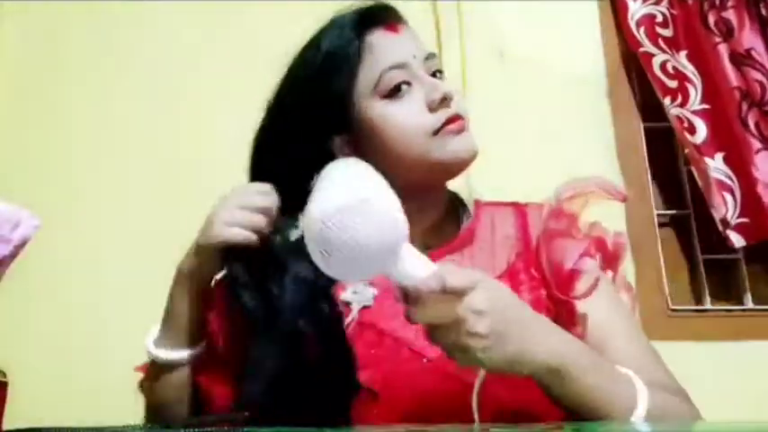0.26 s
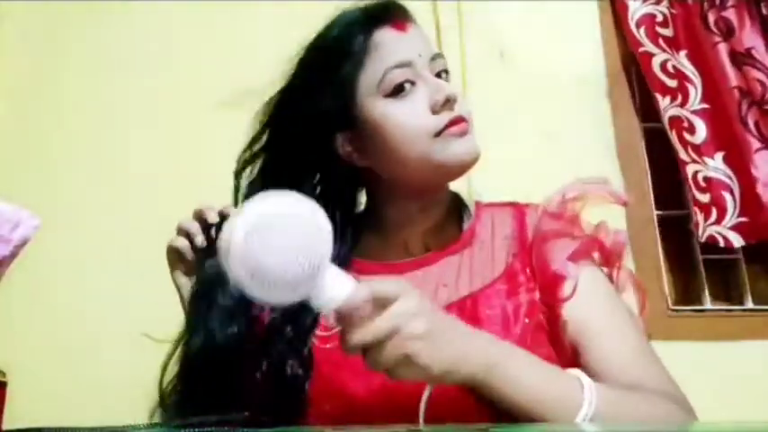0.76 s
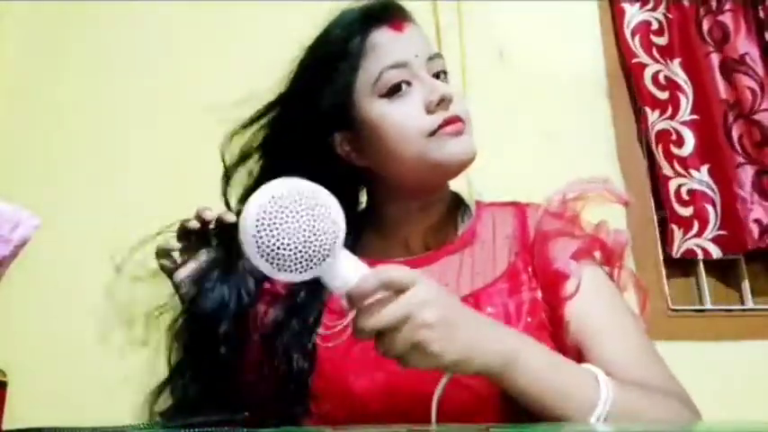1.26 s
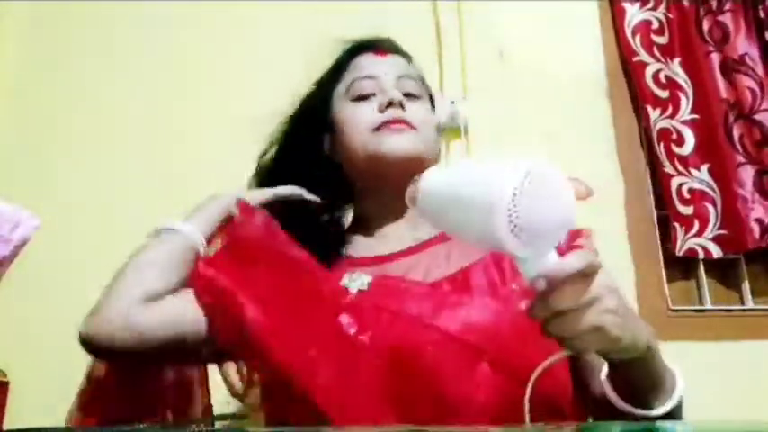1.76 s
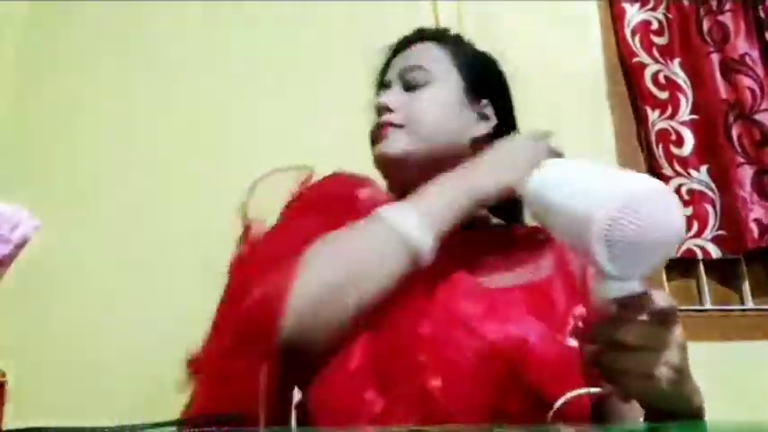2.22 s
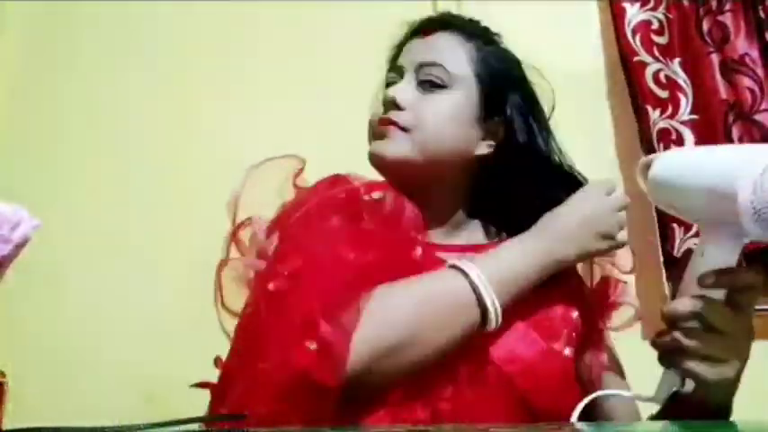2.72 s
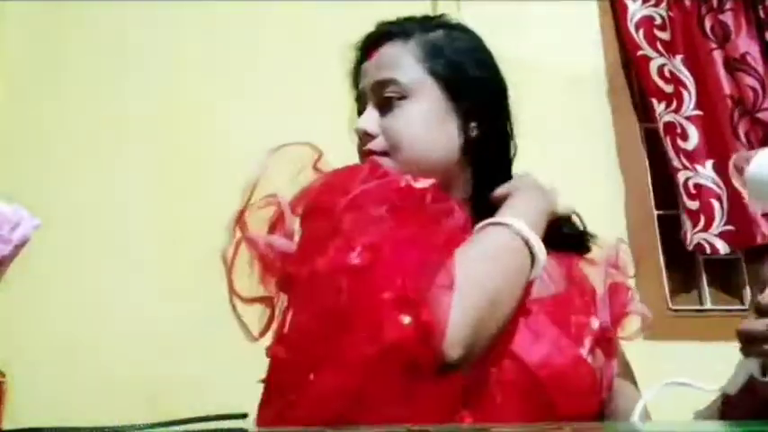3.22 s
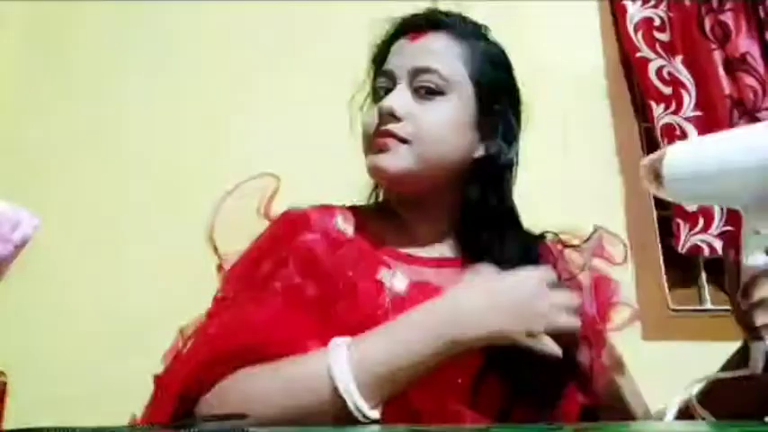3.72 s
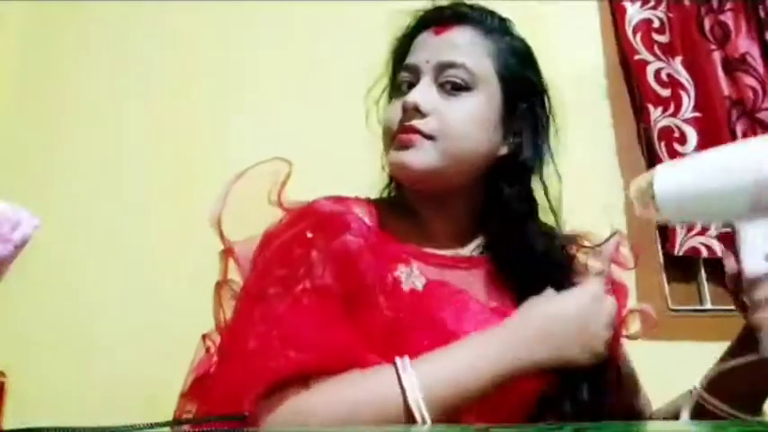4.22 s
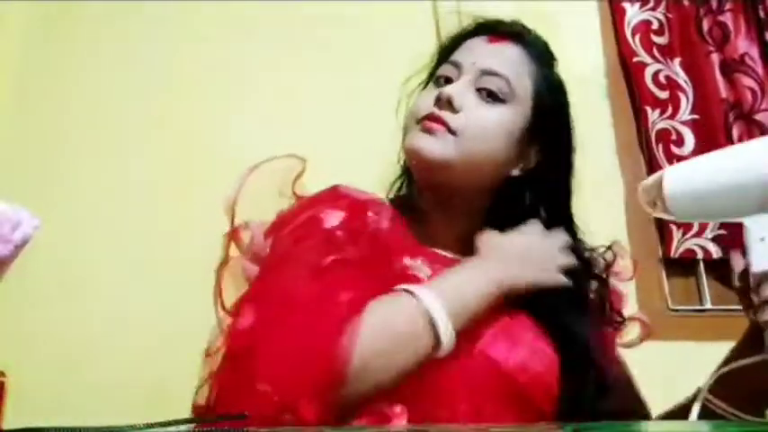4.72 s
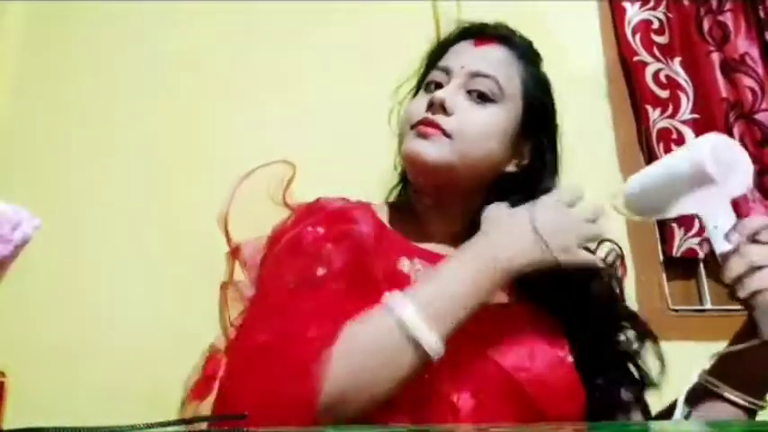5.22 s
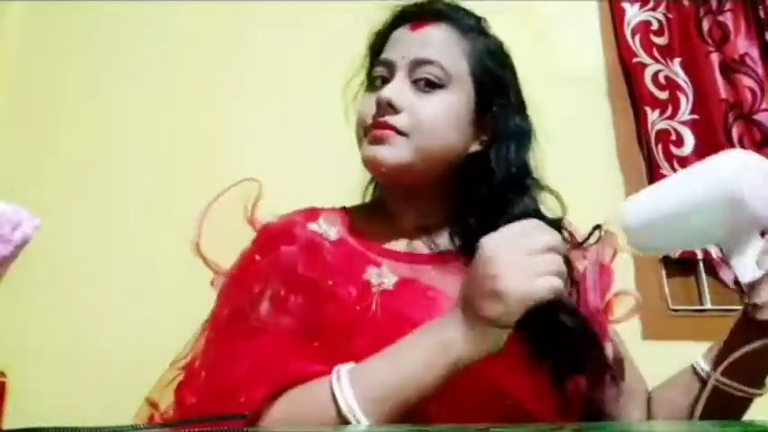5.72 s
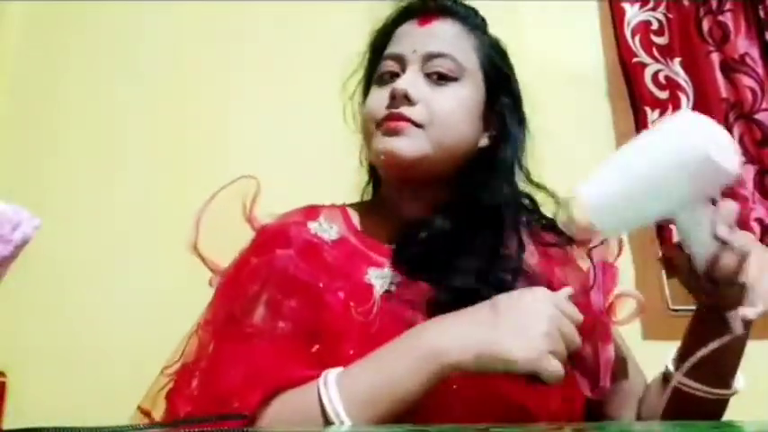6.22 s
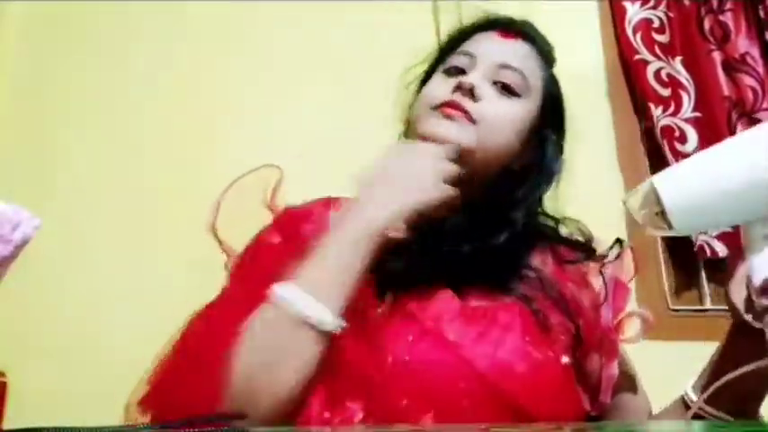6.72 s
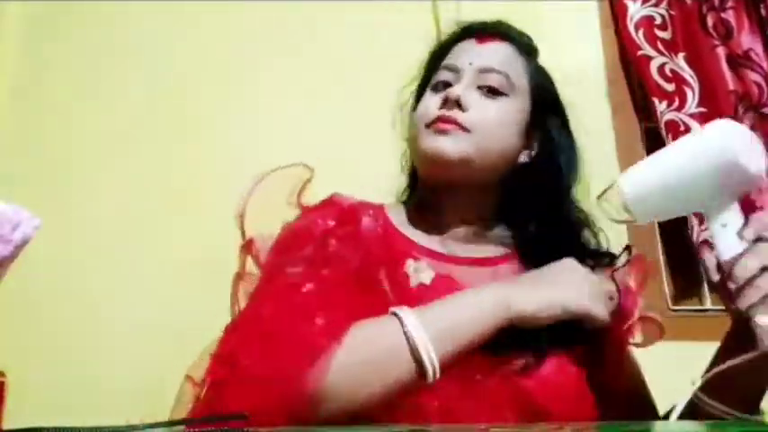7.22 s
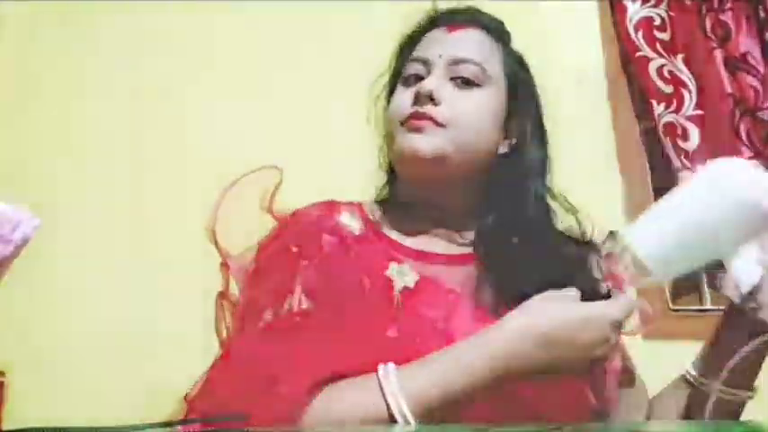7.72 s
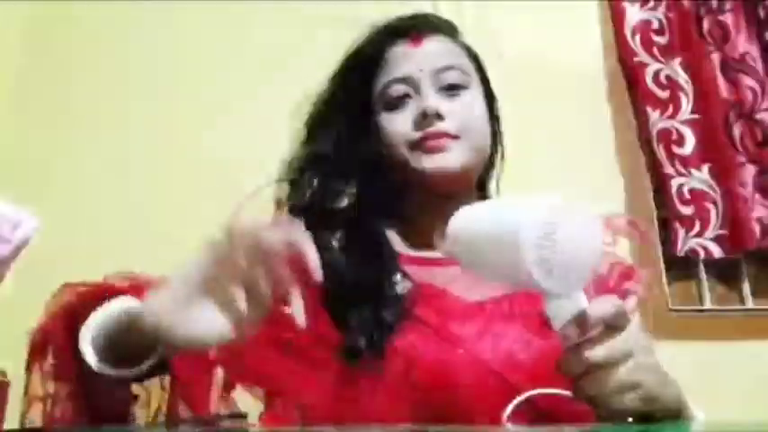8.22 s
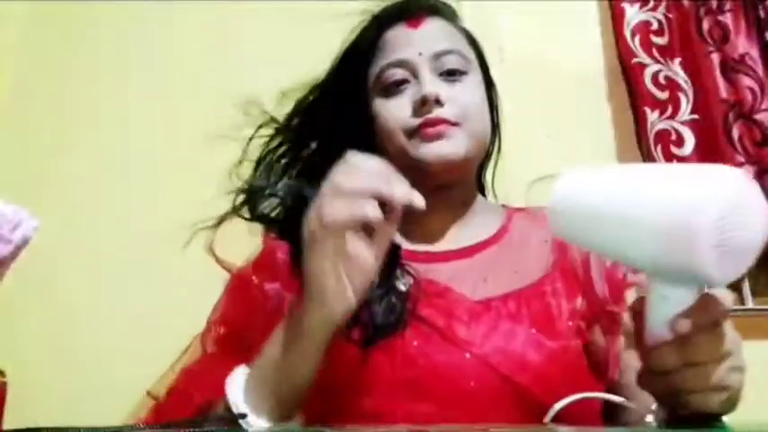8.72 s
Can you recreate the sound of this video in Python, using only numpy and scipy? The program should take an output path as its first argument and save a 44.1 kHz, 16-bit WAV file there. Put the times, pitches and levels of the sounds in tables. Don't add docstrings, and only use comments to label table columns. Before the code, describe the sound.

A handheld hair dryer blows steadily up close in a small room, rushing and howling, fading to silence near eight seconds and returning.

```python
import sys
import numpy as np
from scipy import signal
from scipy.io import wavfile
from scipy.ndimage import uniform_filter1d

SR = 44100
rng = np.random.default_rng(int(sys.argv[2]) if len(sys.argv) > 2 else 0)


def makeup_ratio(level_db):
    decades = np.asarray(level_db, float) / 20
    return 10 ** decades


def file_out(sig):
    cols = np.atleast_2d(sig).T
    lim = np.clip(cols, -1, 1)
    pcm = np.round(lim * 32767).astype(np.int16)
    wavfile.write(sys.argv[1], SR, pcm)


N = 395118


def curve(table, t):
    s, *columns = np.transpose(table)
    return [np.interp(t, s, column) for column in columns]


def colour(table, hz):
    f, value = np.transpose(table)
    return np.interp(np.log(hz + 1), np.log(f), value)


def bump(f, centre_hz, width_hz):
    return np.exp(-((f - centre_hz) / width_hz) ** 2)


def spell(t, start_s, length_s, edge_s):
    return np.clip(np.minimum(t - start_s, start_s + length_s - t) / edge_s + 1, 0, 1)


def slow(shape, size):
    x = rng.standard_normal(shape)
    for axis, k in enumerate(size):
        x = uniform_filter1d(uniform_filter1d(x, k, axis=axis), k, axis=axis)
    return x / x.std()


def walk(rate_hz):
    step = 32
    coarse = slow(shape=(N // step + 2,), size=(max(int(SR / step / rate_hz), 1),))
    return np.interp(np.arange(N) / step, np.arange(len(coarse)), coarse)


def turning(hz, wobble_hz, rate_hz):
    return 2 * np.pi * np.cumsum(hz + wobble_hz * walk(rate_hz)) / SR


def at_ports(tone, hz, pan_db, lead_ms, rough, rate_hz, apart):
    shake = [walk(rate_hz) + 1j * walk(rate_hz) for _ in range(3)]
    side = np.array([[1], [-1]])
    gain = 1 + rough * (shake[0] + apart * np.array(shake[1:])) / np.sqrt(2)
    gain = gain / np.sqrt(1 + rough ** 2 * (1 + apart ** 2))
    delay = np.exp(1j * side * np.pi * hz * lead_ms / 1000)
    return np.sqrt(2) * np.real(tone * gain * makeup_ratio(side * pan_db / 2) * delay)


# time in seconds, grille facing the phone 0-1,
# left port lead from the nozzle in ms.
HOLD = [(0, 0.85, -0.15), (.5, 0.74, -0.085), (1.45, 0.77, -0.2), (1.7, 0.73, -0.1), (2.0, 0.5, -0.15),
        (2.4, 0.7, -0.11), (2.6, 0.41, 0.15), (3.1, 0.3, 0.2), (3.4, 0.25, 0.23), (4.5, 0, 0.17),
        (5.0, 0.03, 0.19), (6.0, 0.1, 0.15), (6.4, 0.09, 0.11), (6.8, 0.05, 0.16), (7.95, 0, 0.12),
        (7.98, 0.59, -0.21), (8.6, 0.91, -.05), (8.96, 0.77, 0.095)]
# time in seconds, left port lead in ms.
GRILLE_BEARING = [(0, -.08), (.5, -.152), (.62, -.163), (1.33, -.163), (1.42, -.149), (1.52, -.13),
                  (1.62, -.04), (2.2, .07), (2.6, .172), (2.87, .162), (3.1, .165), (3.4, .24), (4.6, .24),
                  (5.0, .158), (5.4, .165), (5.6, .2), (5.8, .162), (6.0, .17), (6.5, .167), (7.95, .19),
                  (7.98, .01), (8.68, .133), (8.96, .16)]
# time in seconds, howl level in dB, whine level in dB.
BARREL_TONES = [(0.0, -21.5, -37.5), (1.39, -19.5, -42), (1.75, -20, -35), (2.12, -24, -31.5),
                (2.74, -21, -36), (3.09, -20.5, -35), (3.6, -18.5, -42), (3.82, -19.5, -32),
                (4.3, -22, -32.5), (4.7, -21.5, -32), (5.37, -25, -34), (5.48, -23.5, -30),
                (6.0, -20, -31.5), (6.56, -18, -30.5), (6.83, -19.5, -31), (7.0, -21.5, -35),
                (7.45, -25.5, -32), (8.3, -24, -34), (8.6, -21, -31), (8.96, -21, -29)]
# centre in seconds, length in seconds, gain in dB.
QUIET_SPOTS = [(.07, .01, -6), (.345, .015, -9), (.72, .015, -6), (1.13, .015, -6), (2.6, .015, -7),
               (3.55, .015, -5), (3.67, .015, -6), (4.04, .02, -5), (4.4, .05, -9), (4.77, .02, -5),
               (4.87, .015, -8), (5.0, .015, -9), (5.75, .025, -8), (6.07, .015, -6), (6.39, .04, -10),
               (6.76, .01, -7), (7.06, .015, -6), (7.23, .015, -6), (7.42, .015, -6)]
# time in seconds, roar gain in dB.
HAIR_SWEEPS = [(.3, 1.5), (1.6, 2), (2.45, 0.5), (3.7, 0), (4.7, -0.5), (5.9, 5), (6.15, 4.5), (6.6, 4.5),
               (7.15, 3.5), (7.7, 3), (8.6, 3.5), (8.95, 5.5)]


def handling(t):
    facing, barrel_ms = curve(HOLD, t)
    intake_ms, = curve(GRILLE_BEARING, t)
    howl_db, whine_db = curve(BARREL_TONES, t)
    howl_db = howl_db + sum(db * spell(t, s - length / 2, length, edge_s=.02) for s, length, db in QUIET_SPOTS)
    sweeps_db = sum(db * bump(t, s, .13) for s, db in HAIR_SWEEPS)
    return dict(
        facing=np.clip(facing, 0, 1), intake_ms=intake_ms, barrel_ms=barrel_ms,
        howl_db=howl_db, whine_db=whine_db,
        rush_db=-37.5 + 3 * facing,
        grille_db=-31.5 + 8 * facing,
        fine_db=-41.5 + 3 * facing,
        roar_db=-27.5 + 0.11 * (howl_db - howl_db.mean()) + sweeps_db,
        howl_pan_db=-1.5 + 24 * intake_ms,
        hiss_pan_db=6 * intake_ms,
        whine_pan_db=2 - 21.5 * intake_ms + 40 * (barrel_ms - intake_ms),
        lifted_hz=2520 + 2200 * intake_ms)


BLADE_HZ, STALL_HZ = 1233.3, 363.6
# blade multiple, stall multiple, level in dB re the whine, roughness 0-1,
# share that leaves by the grille 0-1.
WHINE_FAMILY = [
    (1, 0, 2.6, 0.2, 0.03),
    (0, 1, -20, 1, 0.1),
    (1, 1, -14, 0.8, 0.7),
    (2, 0, -22, .5, 1),
    (2, 1, -17, 0.9, 1),
    (3, 0, -24, .5, 1),
    (4, 0, -16.5, 0.9, 1),
    (5, 0, -19.5, .5, 0.4),
]


def fan():
    held = handling(np.arange(N) / SR)
    howl_db = held["howl_db"] + 0.12 * walk(1.8)
    whine_db = held["whine_db"] + 0.85 * walk(5.6)
    howl_pan_db = held["howl_pan_db"] + 0.77 * walk(4.9)
    whine_pan_db = held["whine_pan_db"] + 2.9 * walk(4.2)
    lead_ms = held["barrel_ms"]
    blade = turning(BLADE_HZ, wobble_hz=4.6, rate_hz=22)
    stall = turning(STALL_HZ, wobble_hz=10, rate_hz=80)
    howl = makeup_ratio(howl_db + 2.23) * np.exp(1j * (blade - stall))
    howl = at_ports(howl, BLADE_HZ - STALL_HZ, howl_pan_db, lead_ms, rough=0.34, rate_hz=60, apart=1.0)
    grille_db = held["grille_db"] - 8.0 - whine_db
    family = 0
    for blades, stalls, db, rough, share in WHINE_FAMILY:
        level = makeup_ratio(db + share * grille_db) * (1 + rough * walk(31))
        family = family + level * np.exp(1j * (round(blades) * blade + round(stalls) * stall))
    whine = makeup_ratio(whine_db - 3.0) * family
    return howl + at_ports(whine, BLADE_HZ, whine_pan_db, 0.41 * lead_ms, rough=0.22, rate_hz=34, apart=0.72)


# frequency in Hz, spectral level in dB.
RUSH_COLOUR = [(25, -9), (60, -22), (110, -21), (160, -10), (240, 1.5), (310, -0.5), (450, 3), (650, 4.5),
               (800, 10), (1000, -38)]
ROAR_COLOUR = [(550, -35), (700, -14), (800, 1.5), (870, 5), (950, 7.5), (1050, -1.5), (1150, -0.5),
               (1300, -3.5), (1500, -13.5), (1800, -66)]
GRILLE_COLOUR = [(1100, -29.5), (1400, -3), (1600, -0.7), (1850, -4), (2300, -1.5), (2900, -1),
                 (3300, -2.5), (4000, -4.5), (5600, -8), (6050, -10.5), (6300, -32), (7200, -21.5)]
FINE_COLOUR = [(5000, -8), (6050, 8), (6300, 17), (7000, 8), (9000, 6), (11200, 5.5), (12000, 5),
               (14000, 3.5), (15600, 5), (17000, -26)]


def turbulence(hz, held, side):
    hiss_pan_db, howl_pan_db = held["hiss_pan_db"], held["howl_pan_db"]
    power = 0
    for table, db, lean_db in [
            (RUSH_COLOUR, held["rush_db"] + 3.0, 0.069 * howl_pan_db),
            (ROAR_COLOUR, held["roar_db"] + 2.5, 0.39 * howl_pan_db),
            (GRILLE_COLOUR, held["grille_db"] + 0.27, 0.7 * (hiss_pan_db - hiss_pan_db.mean())),
            (FINE_COLOUR, held["fine_db"] + 0.29, 0 * hiss_pan_db)]:
        shape = makeup_ratio(colour(table, hz)) ** 2
        power = power + (shape / shape.mean())[:, None] * makeup_ratio(db + side * lean_db / 2) ** 2
    return power


# start in seconds, length in seconds, frequency in Hz, depth 0-1.
CLEAR_PATHS = [(.36, .04, 3800, .5), (.48, .07, 3250, .9), (.55, .03, 3650, .6), (.6, .07, 3050, .65),
               (.86, .24, 3250, .68), (.95, .18, 2850, .65), (1.11, .07, 3000, .75), (1.19, .04, 3650, .6),
               (1.25, .05, 3300, .9), (1.28, .06, 2950, .9), (1.38, .04, 2750, .6), (1.4, .05, 3450, .9),
               (1.47, .06, 3900, .7), (2.42, .03, 2700, .55), (2.56, .02, 2900, .6), (2.63, .04, 2850, 1),
               (2.68, .08, 3000, .75), (2.85, .04, 3050, .9), (2.88, .07, 3150, .75),
               (2.92, .16, 2700, .55), (3.0, .1, 3150, .62), (3.54, .03, 4550, .8), (4.07, .03, 3250, .65),
               (5.05, .04, 3200, .8), (5.14, .03, 2700, .6), (5.18, .05, 3250, .6), (5.28, .08, 3050, .68),
               (5.44, .04, 3000, .6), (4.95, .08, 3050, .55), (3.65, .1, 2150, .6), (5.59, .05, 2400, .7),
               (5.7, .05, 2650, .7), (5.73, .07, 3200, .65), (5.82, .02, 2250, .6), (6.0, .03, 2900, .65),
               (6.09, .05, 3000, .7), (6.44, .06, 3000, .65), (7.53, .04, 3000, .4), (8.67, .13, 3600, .95),
               (8.82, .13, 3350, .75)]


def clear_paths(f, t):
    return np.max([depth * spell(t, s, length, edge_s=.02) * np.exp(-((f - at_hz) / (depth * 370)) ** 4)
                   for s, length, at_hz, depth in CLEAR_PATHS], axis=0)


# start in seconds, length in seconds, frequency in Hz, pull 0-1, lift in dB.
IN_STEP_GLINTS = [(0, 0.26, 2300, 0.66, 1.5), (1.55, .55, 2400, 0.65, -1), (2.75, 1.2, 3800, 0.86, -1.5),
                  (4.65, 2.9, 3720, 0.6, -1), (5.0, 2.6, 245, 0.3, 4.5), (5.85, 0.1, 2480, .5, 2),
                  (6.0, 1.5, 2400, 0.35, 0.7), (6.25, 0.23, 2260, .4, 1.5), (7.98, .4, 2440, .6, -0.3),
                  (1.58, .9, 1940, .6, .1), (1.58, .1, 3120, .6, -1), (7.98, 0.86, 1910, 0.6, -0.5),
                  (7.98, 0.42, 3330, 0.8, -1.5), (8.75, .2, 1500, .01, -6)]


def glints(f, t):
    in_step, lift_db = 0, 0
    for s, length, at_hz, pull, db in IN_STEP_GLINTS:
        glint = spell(t, s, length, edge_s=.06) * np.exp(-(np.log((f + 1) / at_hz) / .11) ** 2)
        in_step = in_step + pull * glint
        lift_db = lift_db + db * glint
    return np.clip(in_step, 0, 1), lift_db


def patches(f, size, held, side, uneven):
    facing, lifted_hz = held["facing"], held["lifted_hz"]
    ridges_db = uneven * np.array([1.52 * slow(shape=size, size=(5, 70)) for _ in range(2)])
    ridges_db = ridges_db + 0.46 * slow(shape=size, size=(5, 70))
    lifted = bump(f, lifted_hz, 300) + bump(f, lifted_hz + 1800, 300)
    ridges_db += (1 + 0.1 * side * uneven) * (.3 + 4 * facing ** 2) * lifted
    ridges_db += 2 * (1 - facing) * bump(f, 3760, 180)
    eddies_db = 0.6 * slow(shape=size, size=(60, 2)) + 1.64 * slow(shape=size, size=(8, 3))
    patch_db = np.clip(f / 2500, .3, 1) * (ridges_db + eddies_db)
    draughts_db = 2 * slow(shape=size[1:], size=(7,)) + 5 * slow(shape=size, size=(2, 9)) * (f > 40) - 3.5
    patch_db = patch_db + draughts_db / (1 + (f / 140) ** 6)
    return patch_db - 3.2 * (1 - facing) / (1 + (11800 / (f + 1)) ** 16)


def port_lead(f, held, intake, null, in_step):
    facing, intake_ms = held["facing"], held["intake_ms"]
    lead = 2 * np.pi * f * ((1 - intake) * held["barrel_ms"] + intake * intake_ms) / 1000
    lead = lead - 0.17 * intake * np.sin(2 * lead)
    lead = lead * (1 - (.5 + .3 * facing) * bump(f, 1875, 200))
    opposite = np.pi * np.sign(intake_ms)
    wrap = bump(f, 1423, 120) * np.clip(np.abs(intake_ms) / 0.051, 0, 1)
    lead = (1 - wrap) * lead + wrap * opposite
    lead = (1 - in_step) * lead + in_step * 2 * np.pi * np.round(lead / (2 * np.pi))
    return lead + np.clip(2.5 * null, 0, 1) * (opposite - lead)


# frequency in Hz, left minus right in dB.
PORT_BALANCE = [(30, -6), (60, -6), (200, 1), (1800, 0), (2200, 1.5), (3000, 3.5), (4500, 4), (5600, 6),
                (6500, -9), (7700, -12), (9000, -4.5), (12000, -6), (16000, 1)]
# frequency in Hz, share 0-1.
SHARED_SOUND = [(25, 0.3), (60, 0.5), (150, .94), (400, .94), (560, .78), (850, 0.83), (1100, 0.74),
                (1450, 0.82), (1850, .6), (2400, 0.62), (3300, 0.78), (3900, 0.78), (4400, 0),
                (16000, 0.24)]


def airflow():
    frame, overlap = 1024, 768
    white = rng.standard_normal((3, N)).astype(np.float32)
    hz, t, noise = signal.stft(white, SR, nperseg=frame, noverlap=overlap)
    held = handling(t)
    f, side = hz[:, None], np.array([1, -1])[:, None, None]
    facing = held["facing"]
    null = clear_paths(f, t)
    in_step, lift_db = glints(f, t)
    uneven = np.clip(1 - 1.25 * null, 0, 1)
    patch_db = patches(f, (len(hz), len(t)), held, side, uneven) + lift_db
    balance_db = uneven * colour(PORT_BALANCE, f) * (0.27 + 0.67 * facing)
    gain = np.sqrt(turbulence(hz, held, side)) * makeup_ratio(patch_db + side * balance_db / 2)
    intake = 1 / (1 + (1600 / (f + 1)) ** 12)
    lead = port_lead(f, held, intake, null, in_step)
    alike = np.clip(colour(SHARED_SOUND, f) * (1 - intake + intake * .78), 0, 1)
    alike = np.minimum(1 - (1 - alike) * uneven * (1 - in_step * (facing > .4)), .975)
    heard = np.sqrt(alike) * noise[0] * np.exp(.5j * side * lead) + np.sqrt(1 - alike) * noise[1:]
    return signal.istft(gain * heard, SR, nperseg=frame, noverlap=overlap)[1][:, :N]


def scene():
    return fan() + airflow()


BLOCK = 1024
# lower edge in Hz, upper edge in Hz, share of the time 0-1.
GATED_BANDS = [(5950, 6120, .16), (6700, 6950, .1), (7600, 7950, .03), (8600, 8800, .04), (9300, 9600, .05),
               (10250, 10900, .04), (10900, 11650, .2), (11650, 12350, .46), (12350, 13050, .52),
               (13050, 13800, .62), (13800, 14500, .6), (14500, 15200, .48), (15200, 15900, .74)]


def band_gate(x):
    lead_in, band, low_bands = 583, 4, 20
    pair = np.pad(np.array([x[0] + x[1], x[0] - x[1]]) / 2, ((0, 0), (lead_in, 0)))
    z = signal.stft(pair, SR, window="cosine", nperseg=2 * BLOCK, noverlap=BLOCK)[2]
    blocks = z.shape[-1]
    power = (np.abs(z[:, :BLOCK]) ** 2).reshape(2, -1, band, blocks).mean(axis=2) + 1e-18
    db = 10 * np.log10(uniform_filter1d(power, size=2, axis=2))
    db = db + 1.3 * slow(shape=power.shape, size=(1, 3, 3))
    lone = db < uniform_filter1d(db, size=15, axis=1) - 5.0
    lone[:, :low_bands] = False
    kept = (db > db[::-1] - 10.6) & ~lone
    need = slow(shape=(2, len(GATED_BANDS), blocks), size=(1, 1, 2))
    need = need + .8 * slow(shape=(len(GATED_BANDS), blocks), size=(1, 3))
    for k, (low_hz, high_hz, share) in enumerate(GATED_BANDS):
        rows = slice(*(int(hz * 2 * BLOCK / SR / band) for hz in (low_hz, high_hz)))
        weak_first = .1 * (1 + (10000 < low_hz < 13500))
        short = need[:, k] - weak_first * uniform_filter1d(db[:, rows].mean(axis=(0, 1)), size=5)
        kept[:, rows] &= (short < np.quantile(short, 1 - share))[:, None]
    top = int(11650 * 2 * BLOCK / SR / band)
    kept[:, top:] &= rng.random(kept[:, top:].shape) > .32
    gain = makeup_ratio(1.1 * rng.standard_normal((1, BLOCK // band // 32, blocks)).repeat(32, axis=1))
    gain[:, :low_bands] = 1
    z[:, :BLOCK] *= (kept * gain).repeat(band, axis=1)
    y = signal.istft(z, SR, window="cosine", nperseg=2 * BLOCK, noverlap=BLOCK)[1]
    mid, side = y[:, lead_in:lead_in + N]
    return np.array([mid + side, mid - side])


FADE_S = 7.966


def joins(x):
    n = np.arange(N)
    ripple = makeup_ratio(1.25 * (n < FADE_S * SR) * np.cos(2 * np.pi * (n - 225) / BLOCK)) - 1
    bass = signal.sosfiltfilt(signal.butter(2, 1350, fs=SR, output="sos"), x)
    return x + ripple * (x - .7 * bass)


def low_pass(x):
    return signal.sosfilt(signal.butter(12, 15700, fs=SR, output="sos"), x)


def record(dry):
    from_change_s = np.abs(np.arange(N) / SR - FADE_S)
    fade = np.clip((from_change_s - 0.0094) / 0.47, .002, 1)
    return low_pass(joins(band_gate(dry)) * fade)


dry = scene()
out = record(dry)
file_out(out)
```